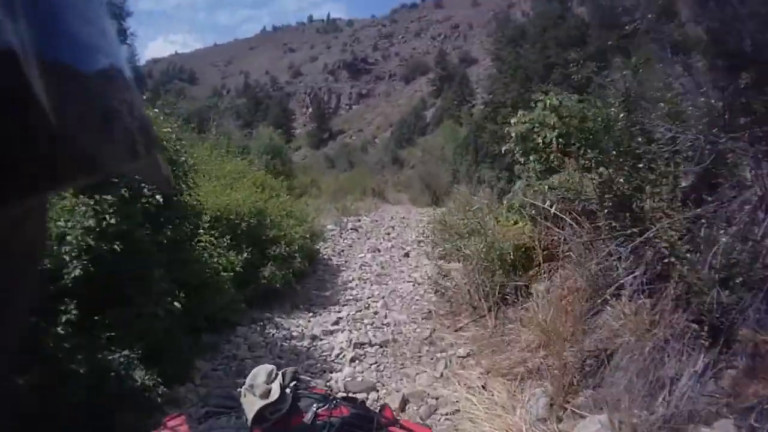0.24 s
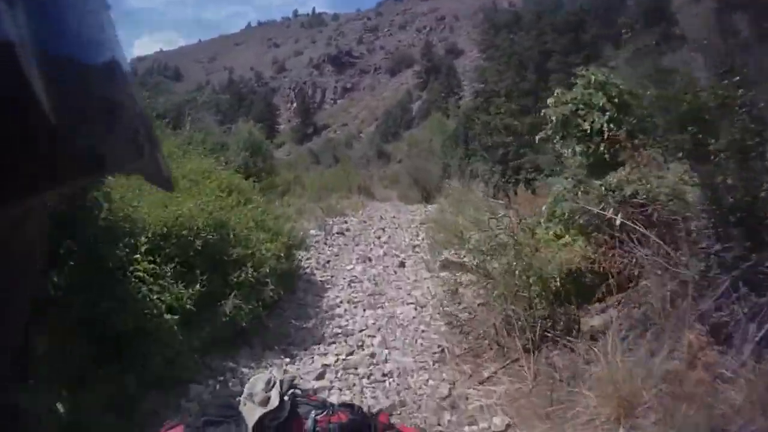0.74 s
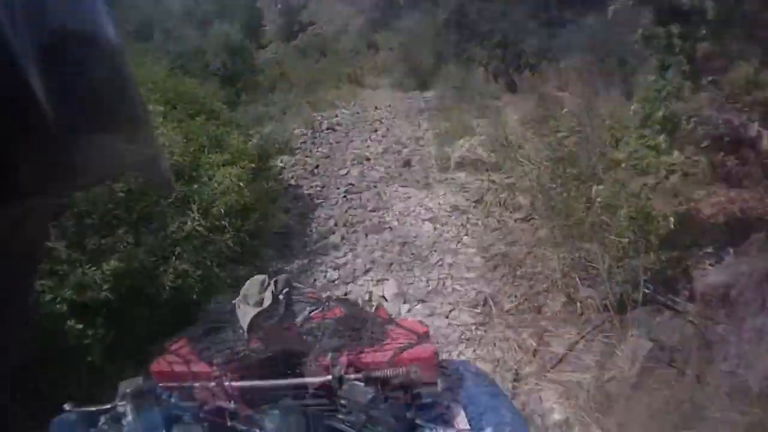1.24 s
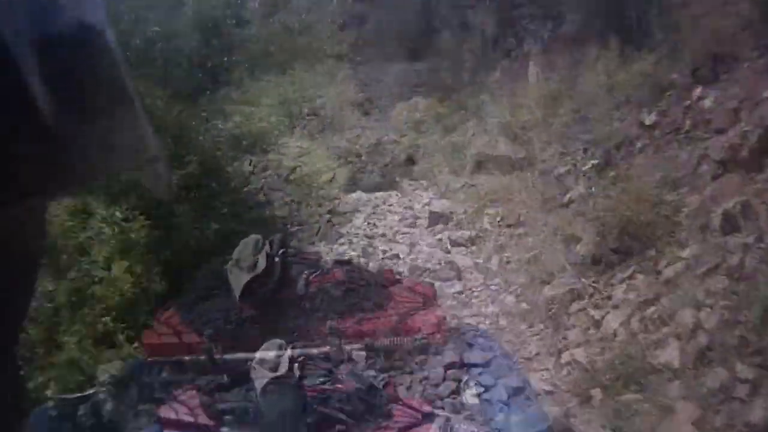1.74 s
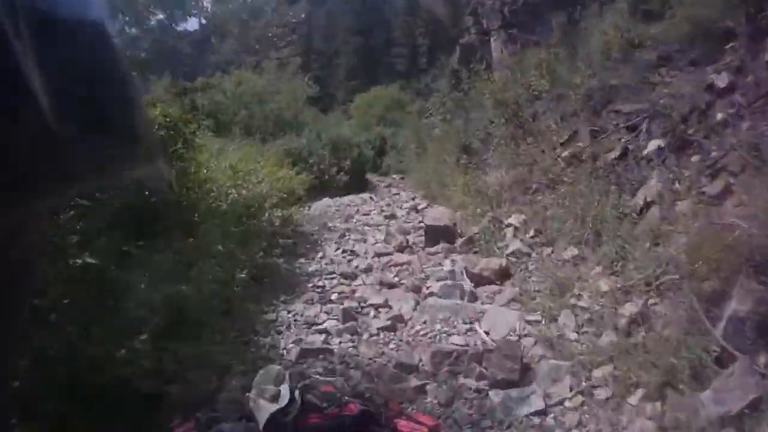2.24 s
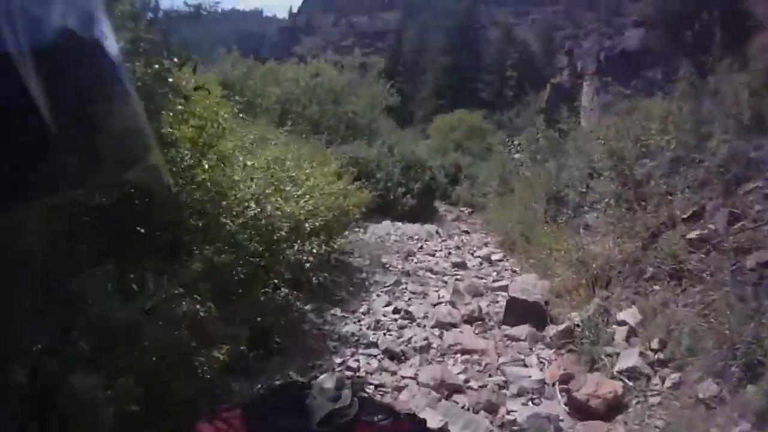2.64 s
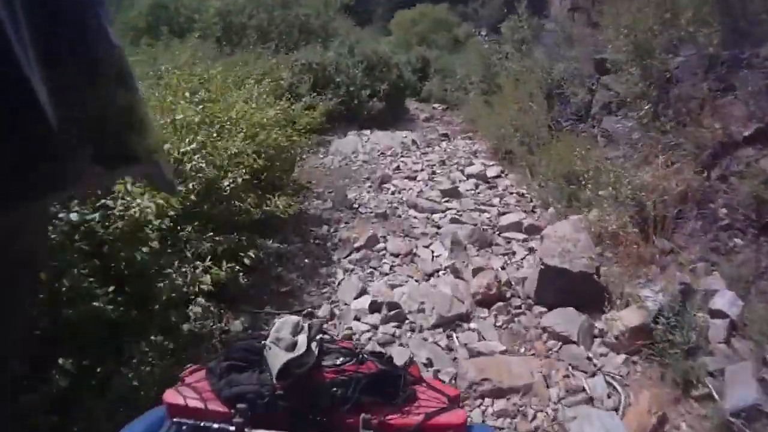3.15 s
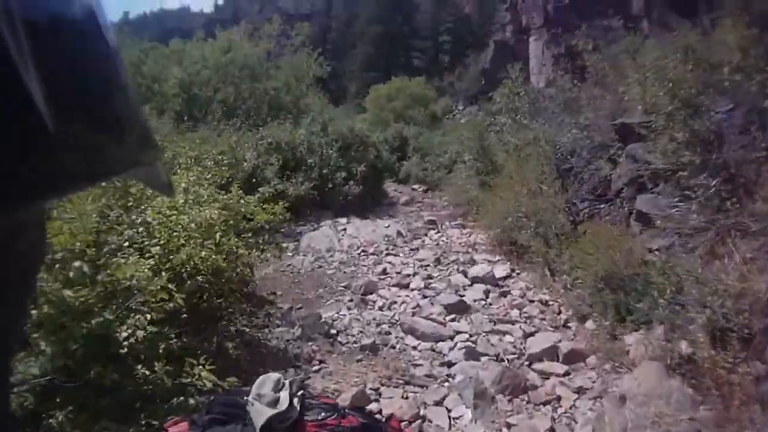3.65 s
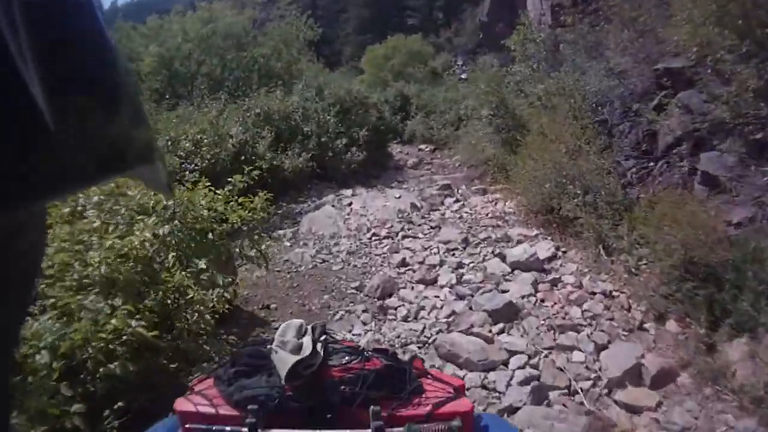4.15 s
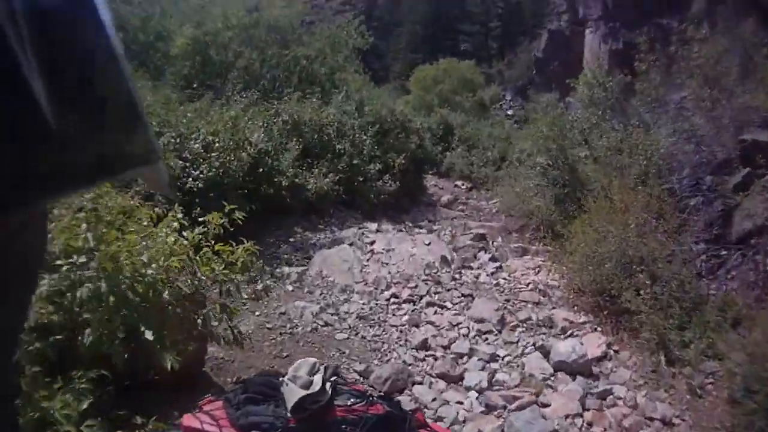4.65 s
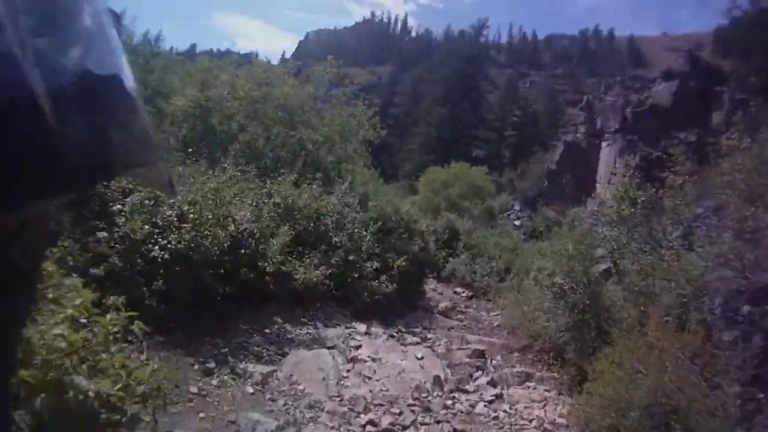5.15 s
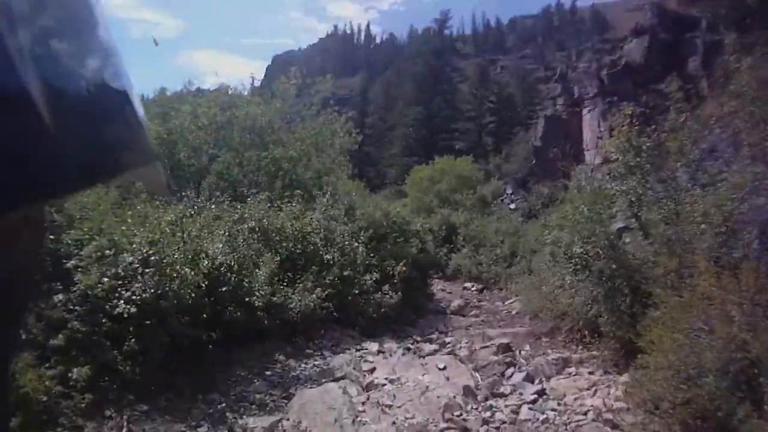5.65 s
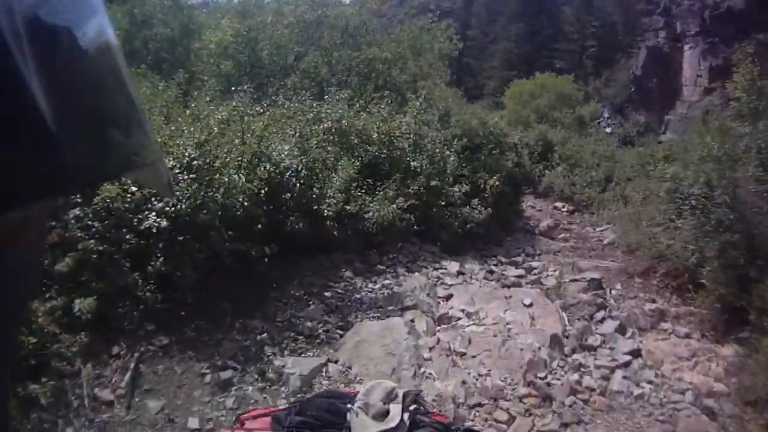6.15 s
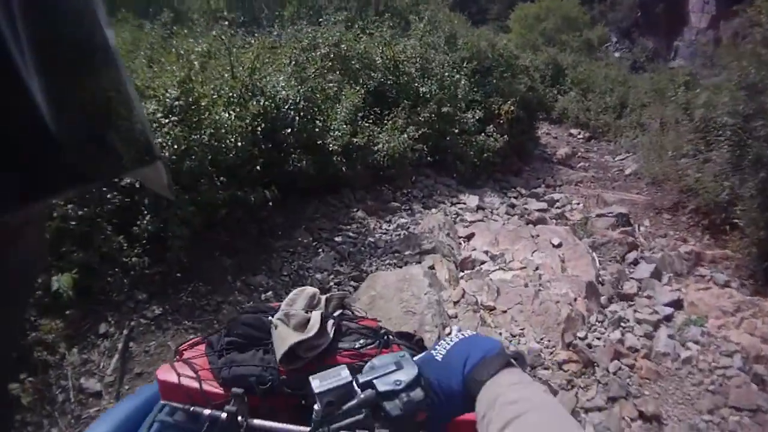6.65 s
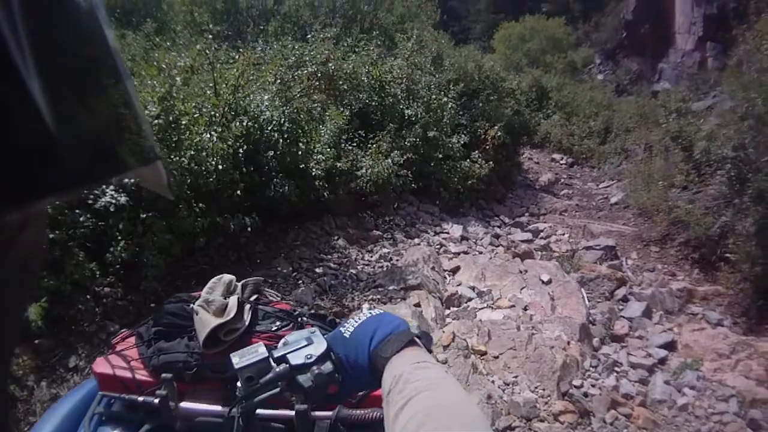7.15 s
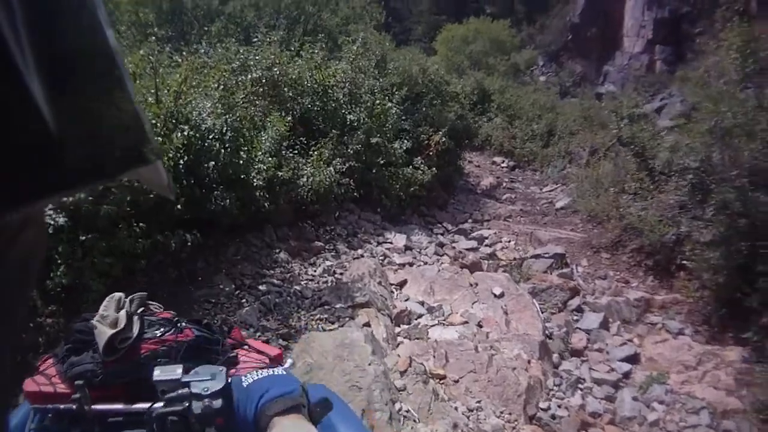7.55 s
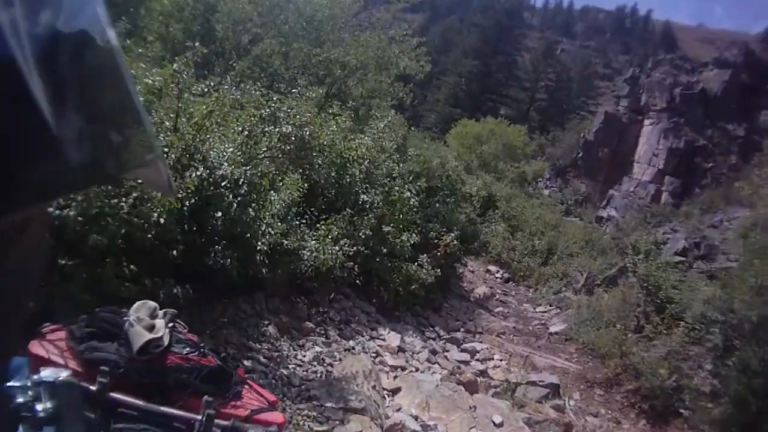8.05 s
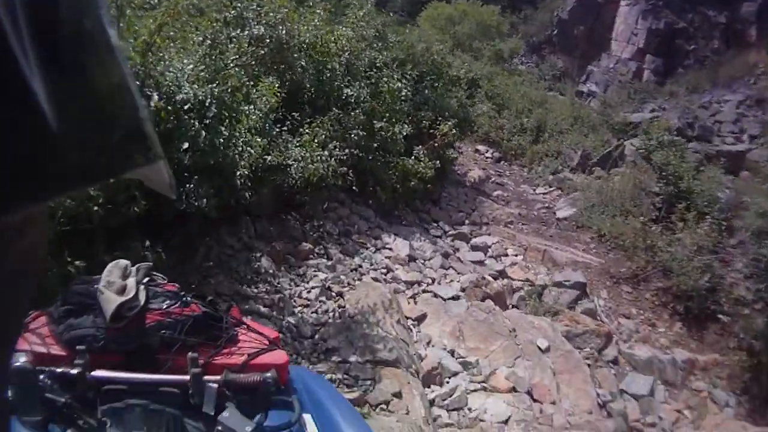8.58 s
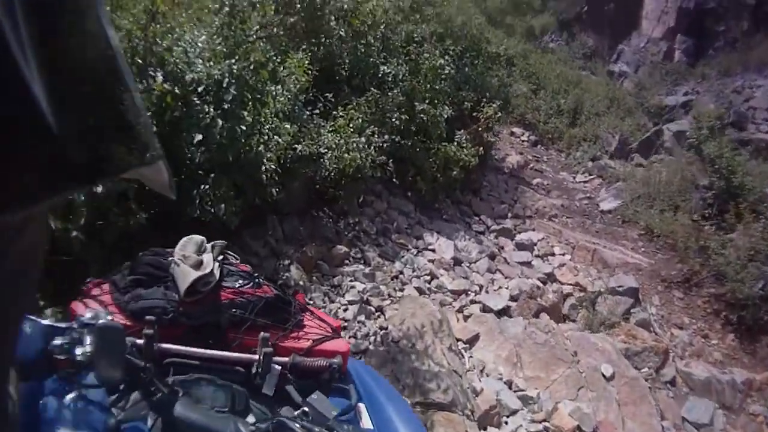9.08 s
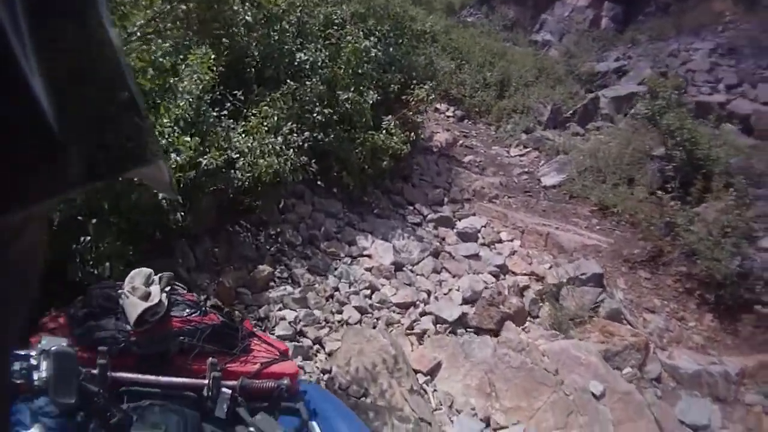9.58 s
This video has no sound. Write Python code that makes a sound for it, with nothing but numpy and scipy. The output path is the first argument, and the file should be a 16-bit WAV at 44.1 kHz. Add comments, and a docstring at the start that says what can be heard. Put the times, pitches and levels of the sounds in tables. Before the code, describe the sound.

A single-cylinder quad bike growls down a rocky trail, drops to a thudding idle and revs once, amid stone clacks, chassis thumps and plastic ticks.

```python
"""A single-cylinder quad bike engine pulls, sinks to a thudding idle and is revved once more, on a rocky trail.
Heard from the rider's seat, each firing excites the exhaust's damped resonances; knocks ring pipe and air box.
Frame rumble and mechanical whirr are coloured noise; the crankshaft adds a hum at multiples of its rate.
Stones clack, the chassis thumps and plastic ticks close by: short blows ring damped modes.
Gravel crunches as a dense train of random grains, over a faint steady hiss."""
import sys
import numpy as np
from scipy import signal
from scipy.fft import rfft, irfft
from scipy.io import wavfile

SR = 44100
rng = np.random.default_rng(int(sys.argv[2]) if len(sys.argv) > 2 else 0)


def wav_record(signal):
    """Record a signal, one row per channel, as 16-bit PCM in the file named by sys.argv[1]."""
    frames = np.transpose(np.atleast_2d(signal))
    bounded = np.clip(frames, -1, 1)
    # unit amplitude maps onto the largest positive 16-bit level
    quanta = np.round(bounded * 32767).astype(np.int16)
    wavfile.write(sys.argv[1], SR, quanta)


N = 433062
TIME = np.arange(N) / SR  # s

# faint background hiss: (frequency [Hz], relative density [dB per Hz])
HISS = [(100, -5.5), (4000, -16.0), (10000, -18.0), (16000, -18.5)]
# colour of the cracking grit: (frequency [Hz], relative density [dB per Hz])
GRIT_COLOUR = [(900, -13), (1900, 3), (2600, 3), (4200, -2.5), (5300, -11.5), (6800, -9.5), (10000, -23),
               (15000, -27)]
# tyres scrunching through loose gravel: (time [s], level [dB], half length [s])
SCRUNCHES = [(0.228, -50.5, 0.019), (0.822, -43.5, 0.04), (1.114, -52, 0.025), (1.479, -45, 0.022),
             (1.648, -48, 0.015), (2.39, -51.5, 0.042), (3.652, -52.5, 0.028), (4.51, -58, 0.0088),
             (6.253, -58.5, 0.057), (6.356, -54.5, 0.02), (6.594, -57.5, 0.072)]
# loudest stones under the tyres:
# (time [s], peak before a common lift [dB], pitch [Hz], relative dull part [dB], scrape decay [s])
STONES = [(0.715, -33.5, 2530, -21, 0.0045), (0.8123, -37, 2660, -24, 0.0064),
          (0.853, -37, 2980, -17, 0.0087), (1.0155, -34.5, 3100, -18, 0.0037),
          (1.295, -27.5, 2520, -12, 0.0026), (1.457, -38, 3100, -15, 0.0057),
          (2.39, -34.5, 2210, -7, 0.013), (2.855, -27.5, 2370, -11, 0.0037),
          (2.981, -41, 2600, -23, 0.0049), (3.218, -28.5, 2400, -12, 0.0027), (3.355, -41, 2730, -4, .008),
          (3.384, -50, 3600, -10, .004), (3.505, -35, 2450, -8, 0.0036), (3.567, -46, 2500, -16, .003),
          (3.632, -29.5, 2850, -14, 0.0026), (3.7436, -33, 3040, -20, .005),
          (3.857, -40.5, 2740, -18, .005), (3.922, -32.5, 2500, -7, 0.0039),
          (4.144, -43, 2430, -16, 0.0023), (4.7717, -43, 2540, -5, .004), (5.25, -45, 2300, 8, 0.0046),
          (5.355, -48, 3100, -20, .003), (5.390, -39, 3340, -8, 0.005), (5.53, -27, 2530, -7, 0.0035),
          (6.1883, -38.5, 2440, -7, 0.0037), (8.4056, -38.5, 3010, -16, 0.0022)]
# chassis thumps: (time [s], peak level [dB], pitch [Hz], ring as Q [-])
THUMPS = [(0.231, -29.5, 413, 3.5), (0.584, -33, 514, 3.5), (0.606, -21.5, 530, 4), (1.502, -21, 432, 2.7),
          (2.742, -45, 500, 4), (3.2495, -20, 395, 2.4), (3.356, -28, 690, 2.3), (3.631, -28.5, 810, 10),
          (3.646, -28, 604, 4), (4.356, -25, 470, 3.1), (4.774, -29.5, 540, 3.2), (5.415, -32.5, 610, 4),
          (5.507, -29.5, 480, 5.6), (5.9, -29.5, 340, 4.6), (5.903, -38, 720, 4), (5.912, -26, 458, 4.7),
          (5.921, -37, 680, 4), (6.566, -24, 464, 5.6), (7.021, -29, 464, 2.9), (7.316, -27.5, 567, 4),
          (8.37, -43, 700, 4), (8.612, -37, 404, 5.3), (9.718, -30, 393, 2.5)]
# plastic ticks, before a lift for each part: (time [s], bright snap [dB], lower body [dB])
TICKS = [(1.338, -39.5, -36), (2.2715, -22, -29.5), (2.8352, -31, -42), (3.198, -26, -31),
         (3.4761, -24.5, -30.5), (3.8895, -28, -32.5), (4.9447, -27.5, -25.5), (5.0849, -54, -46.5),
         (5.196, -56, -42), (5.201, -29, -35.5), (5.225, -48, -46), (5.229, -55, -50), (5.396, -54, -53),
         (5.4207, -39, -33), (6.4512, -20.5, -27), (8.4059, -45, -51)]
# modes of the plastic: (frequency [Hz], width [Hz], relative level [dB])
PLASTIC_MODES = [(1590, 69, -2.5), (2190, 360, -16), (3450, 560, 6.5), (4540, 230, -18), (6630, 370, 4.5),
                 (7670, 600, -2), (8390, 800, 0), (9800, 1000, -3), (13000, 2500, -21.5)]
# engine speed: (time [s], firing rate [per s])
FIRING_RATE = [(0.0, 23.6), (0.52, 23.75), (0.62, 29.2), (1.53, 28.5), (1.77, 26.5), (2.34, 22.5),
               (2.49, 21.1), (2.87, 20.28), (3.2, 17.08), (3.99, 15.65), (4.26, 14.32), (4.93, 14.12),
               (5.25, 13.18), (5.41, 13.89), (6.41, 13.01), (7.05, 20.59), (7.6, 21.11), (8.09, 17.7),
               (8.41, 13.15), (8.93, 13.73), (9.12, 13.12), (9.82, 13.59)]
# how the machine is ridden:
# (time [s], throttle [0-1], load on the exhaust [dB], shaking from the ground [dB])
RIDE = [(0, 0.94, -5, 2.1), (.56, 0.71, -5.5, 1.3), (.6, 1, -2.5, 5.5), (1.45, 0.77, -4, 5),
        (1.7, 0.67, -8, 6), (2.05, 0.31, 1.5, 5.5), (2.85, 0.33, -3, 4), (3.6, 0.12, -6.5, 3),
        (4.2, 0.5, -1, 1.5), (4.7, 0.04, -0.5, 2.5), (5.6, 0.16, -1, 0), (6.4, 0.35, 0, 1.34),
        (7.05, 0.84, 2, 0.5), (7.9, 0.68, -0.5, -0.5), (8.35, 0.05, -1, -2), (8.85, 0.42, -0.5, -1.5),
        (9.82, 0, -0.5, -0.5)]
# rumble of frame and panels: (frequency [Hz], relative density [dB per Hz])
RUMBLE_COLOUR = [(20, -37), (50, -13.5), (100, -5.5), (150, -15.5), (220, -3.5), (310, -4), (440, 1.5),
                 (600, -5), (750, -15.5), (900, -24), (1200, -77)]
# whirr of valve gear and drive train: (frequency [Hz], relative density [dB per Hz])
WHIRR_COLOUR = [(600, 12), (950, -0.5), (1250, 3.5), (1650, -1), (1950, 3), (2600, 5), (3050, -5.5),
                (4100, -3), (5200, -19), (6600, -9.5), (10000, -23.5), (15000, -20)]
# rush of gas after each firing: (frequency [Hz], relative density [dB per Hz])
RUSH_COLOUR = [(25, -25), (55, -17), (90, -35), (150, -15), (230, 2), (320, -1), (450, 3), (600, -0.5),
               (760, -11), (900, -21), (1200, -74)]
# machinery knocks: (share of the cycle [-], relative level at idle [dB], growth [dB per octave of speed])
KNOCKS = [(.06, 1.5, 0), (.23, 0, 4), (0.331, -4.5, -1), (.43, -19.5, 18.5), (0.578, -15, 5),
          (.8, -7.5, 7.5)]
# air box and pipe resonances: (frequency [Hz], width [Hz], relative level [dB])
PIPE_RESONANCES = [(406, 101, -2), (464, 81, 1), (555, 30, -13.5), (620, 70, -10), (810, 31, -19)]
# silencer resonances before gas heat and fullness: (frequency [Hz], width [Hz], relative level [dB])
SILENCER_RESONANCES = [(187, 21, -31), (217.9, 83, 8), (252, 160, -4.5)]
# boom of the largest silencer chamber: (time [s], frequency [Hz], relative level [dB])
BOOM = [(0, 112, 7), (.7, 116, -4.5), (1.6, 108, 3), (2.0, 98, 2), (3.05, 97, 4), (3.6, 78, 0),
        (4.0, 99, -1), (6.4, 98, -1), (7.3, 113, 1), (8.2, 101, 1), (9.82, 95, -5)]

# voice laws: (level at idle on smooth ground [dB], growth [dB per octave], growth [dB per dB of shaking])
BARK_LAW = (-51, 6.1, 0.29)
RUSH_LAW = (-51.5, 1.7, 0.6)
RUMBLE_LAW = (-48.5, 3.84, 2.1)
WHIRR_LAW = (-57, 4.96, 1)

# engine cycle: firing rate at idle, starting share of a cycle
IDLE_PER_S, FIRST_PHASE = 13.5, .413
THUD_DB, THUD_DB_PER_OCTAVE = -41.7, 7.6
# an open throttle heats the exhaust gas: factor on its speed of sound, rising further with engine speed
GAS_SPEED_SHUT, GAS_SPEED_PER_THROTTLE, GAS_SPEED_PER_OCTAVE = 0.95, 0.12, 0.19
FULLNESS_POWER = 0.56  # octaves of ring length per octave of speed at full throttle
BOOM_WIDTH_HZ = 50.3  # before fullness
# deep push of gas that rounds each thud and fades with speed
PUSH_HZ, PUSH_WIDTH_HZ, PUSH_DB, PUSH_LOSS_DB_PER_OCTAVE = 62, 37, -4, 17
# tailpipe echo: delay before gas heat, strength at idle, loss per octave of speed
ECHO_S, ECHO_DB, ECHO_LOSS_DB = 0.01037, -7, 7
# the throttle snaps shut after the rev and two firings come out weak
FALTER_S, FALTER_HALF_S, FALTER_LOSS_DB = 8.272, .068, 7
# crankshaft hum: multiples of its turning rate, relative levels, whole level at idle and its growth
CRANK_MULTIPLES = (4, 5, 7, 8, 10)
CRANK_LEVELS_DB = (-4.5, -2.5, -4, -4.5, -6)
CRANK_DB, CRANK_DB_PER_OCTAVE = -70.5, 29
COVER_DB, COVER_HZ = -13.5, 1433.5  # level beside the whirr

# pebbles: time span, count, least level on smooth ground, size range, pitch range
ROLLING_S, PEBBLE_COUNT = 6.7, 260
PEBBLE_DB, PEBBLE_SPREAD_DB, PEBBLE_LOW_HZ, PEBBLE_HIGH_HZ = -60, 5, 1790, 3200
PEBBLE_SHAKING_SHARE = 2.3  # dB per dB of shaking
# thumps: scrape decay by 60 dB, scrape strength, low-pass cutoff over pitch
THUMP_T60_S, THUMP_GRIT, THUMP_TOP_RATIO = 0.08, 0.03, 1.4
# a tick springs back: delay, least and greatest share of the first blow
CATCH_S, CATCH_SHARE = .00099, (.3, .55)
# grit: grain rate, size scale, crunch level over the whirr law, its extra growth per dB of shaking
GRIT_PER_S, GRIT_SPREAD_DB, CRUNCH_DB, CRUNCH_SHARE = 2500, 2.5, -11.5, 0.4
CUTOFF_HZ = 15500


def from_db(db):
    """Amplitude ratio from the logarithmic decibel scale."""
    return 10 ** (np.asarray(db) / 20)


def rms_one(x):
    """Normalization to unit mean power."""
    return x / np.sqrt(np.mean(x ** 2) + 1e-20)


def in_time(rows):
    """Linear interpolation of each column of a curve at every sample."""
    s, *columns = np.transpose(rows)
    return [np.interp(TIME, s, column) for column in columns]


def coloured(x, spectrum):
    """Spectral shaping: a frequency-dependent gain, then unit power."""
    hz, db = np.transpose(spectrum)
    bins = np.maximum(np.arange(N // 2 + 1) * SR / N, 1)
    gain = from_db(np.interp(np.log(bins), np.log(hz), db, right=-90))
    return rms_one(irfft(rfft(x) * gain, N))


def noise(spectrum):
    """Gaussian random noise with a shaped spectrum and unit power."""
    return coloured(rng.standard_normal(N), spectrum)


def drift(per_s):
    """Random modulation: straight lines between Gaussian knots of unit spread."""
    knots = rng.standard_normal(N // 50)
    return np.interp(TIME * per_s, np.arange(len(knots)), knots)


def resonate(x, hz, width_hz):
    """Damped resonance: a pole pair with about unit gain at its peak."""
    r = np.exp(-np.pi * width_hz / SR)
    zeros = np.array([1, 0, -1]) * (1 - r * r) / 2
    poles = [1, -2 * r * np.cos(2 * np.pi * hz / SR), r * r]
    return signal.lfilter(zeros, poles, x + 1e-18)


def lowpass(x, hz, order=2):
    """Butterworth low-pass: maximally flat below the cutoff."""
    return signal.sosfilt(signal.butter(order, min(hz, SR / 2 - 1), fs=SR, output="sos"), x)


def add(out, s, sound, db):
    """Linear superposition of a sound at time s, scaled to the given peak level."""
    at = max(round(s * SR), 0)
    out[at:at + len(sound)] += (from_db(db) * sound / np.abs(sound).max())[:N - at]


def contact(length_s, grit):
    """Impulsive contact: a unit blow followed by exponentially decaying friction noise."""
    t = TIME[:SR // 6]
    scrape = grit * rng.standard_normal(len(t)) * np.exp(-t / length_s)
    return (t == 0) + scrape


def engine_state():
    """Logarithmic speed scale: firing rate, octaves over idle, and the ride's controls."""
    per_s, = in_time(FIRING_RATE)
    return per_s, np.log2(per_s / IDLE_PER_S), *in_time(RIDE)


def level_db(law, octaves, shaking_db):
    """Power-law excitation: level rises linearly with octaves of speed and decibels of shaking."""
    idle_db, db_per_octave, share = law
    return idle_db + db_per_octave * octaves + share * shaking_db


def background_hiss():
    """Stationary random noise at a faint, even level."""
    return from_db(-70.5) * noise(HISS)


def gravel():
    """Shot noise: random grit grains form a running crunch and short stronger spurts."""
    _, octaves, _, _, shaking_db = engine_state()
    spurts = sum(from_db(db) * np.exp(-((TIME - s) / half_s) ** 2) for s, db, half_s in SCRUNCHES)
    crunch_db = level_db(WHIRR_LAW, octaves, shaking_db) + CRUNCH_DB + CRUNCH_SHARE * shaking_db
    crunch = from_db(crunch_db + 1.6 * drift(45))
    sizes = from_db(GRIT_SPREAD_DB * np.minimum(rng.exponential(1, N), 4)) * rng.choice([-1, 1], N)
    grains = sizes * (rng.random(N) < GRIT_PER_S / SR)
    # the two envelopes add in power
    return np.hypot(spurts, crunch) * coloured(grains, GRIT_COLOUR)


def clack(hz, dull_db, scrape_s):
    """Modal impact: a grating stone rings close, heavily damped modes over a duller knock."""
    blow = contact(length_s=scrape_s, grit=.11)
    modes = resonate(blow, hz, 350) - 0.099 * resonate(blow, 1.23 * hz, 290)
    ring = resonate(modes, hz, 1100)
    knock = 0.9 * resonate(blow, 1940, 220) - resonate(blow, 1364, 180) + 0.84 * resonate(blow, 840, 170)
    return lowpass(ring + from_db(dull_db + 2.5) * knock, 1.27 * hz, order=4)


def stones():
    """Random impacts: loud clacks at set times and small pebbles at chance times while the wheels roll."""
    out = np.zeros(N)
    for s, db, hz, dull_db, scrape_s in STONES:
        add(out, s, clack(hz, dull_db, scrape_s), db + 2)
    *_, shaking_db = engine_state()
    for when, size, pitch in rng.random(size=(PEBBLE_COUNT, 3)):
        s = when * ROLLING_S
        hz = PEBBLE_LOW_HZ + (PEBBLE_HIGH_HZ - PEBBLE_LOW_HZ) * pitch
        db = PEBBLE_DB + PEBBLE_SHAKING_SHARE * shaking_db[int(s * SR)] + PEBBLE_SPREAD_DB * size ** 2
        add(out, s, clack(hz, dull_db=-17.0, scrape_s=0.004), db)
    return out


def chassis():
    """Structural impulse response: a rock jolts frame and load, ringing two close modes in a dry knock."""
    out = np.zeros(N)
    for s, db, hz, q in THUMPS:
        blow = contact(length_s=THUMP_T60_S / np.log(1000), grit=THUMP_GRIT)
        knock = resonate(blow, hz, hz / q) - from_db(-1.0) * resonate(blow, 0.866 * hz, hz / q)
        add(out, s, lowpass(resonate(knock, hz, 480), THUMP_TOP_RATIO * hz, order=4), db)
    return out


def plastic_ticks():
    """Slip and elastic rebound: opposite blows a millisecond apart ring the modes of hard plastic."""
    out = np.zeros(N)
    is_body = np.array(PLASTIC_MODES)[:, 0] < 5500
    for s, snap_db, body_db in TICKS:
        slip = contact(length_s=.002, grit=.03)
        slip[round(CATCH_S * SR)] -= rng.uniform(*CATCH_SHARE)
        modes = np.array([from_db(db + rng.normal(0, 1)) * resonate(slip, hz, width_hz)
                          for hz, width_hz, db in PLASTIC_MODES])
        body = modes[is_body].sum(axis=0)
        snap = modes[~is_body].sum(axis=0)
        # subtracting the low-passed part thins out the bass
        add(out, s, body - lowpass(body, 700, order=1), body_db + 6.0)
        add(out, s + .0001, snap, snap_db + 9.5)
    return out


def firings(cycles, per_s, uneven_db, jitter_s):
    """Quasi-periodic pulse train: one uneven click per cycle, scaled for even mean power at any rate."""
    at = np.flatnonzero(np.diff(np.floor(cycles)) > 0)
    chance = rng.standard_normal((len(at), 2))
    moved = np.clip(at + (chance[:, 1] * jitter_s * SR).astype(int), 0, N - 1)
    clicks = np.zeros(N)
    clicks[moved] = from_db(uneven_db * chance[:, 0]) / np.sqrt(per_s[at])
    return clicks


def surge(since_s, delay_s, length_s, steady):
    """Periodic amplitude modulation: a swell after each firing over a steady part, at unit power."""
    return rms_one(steady + np.exp(-((since_s - delay_s) / length_s) ** 2))


def crank(cycles, octaves):
    """Harmonic forced vibration: the crankshaft, turning twice per firing, hums louder with speed."""
    hum = 0
    for multiple, db in zip(CRANK_MULTIPLES, CRANK_LEVELS_DB):
        tone = np.sin(2 * np.pi * (multiple * 2 * cycles + rng.random()))
        hum = hum + from_db(db + 2 * drift(5)) * tone
    return from_db(CRANK_DB + CRANK_DB_PER_OCTAVE * octaves) * rms_one(hum)


def whirr(since_s, octaves, shaking_db):
    """Modulated broadband noise: valve gear and drive train swell per firing, with a narrow cover ring."""
    cover = rms_one(resonate(rng.standard_normal(N), COVER_HZ, 40)) * from_db(1.9 * drift(10))
    swell = surge(since_s, delay_s=0.019, length_s=0.016, steady=2.4)
    gain = from_db(level_db(WHIRR_LAW, octaves, shaking_db) + 2.43 * drift(90))
    return gain * (noise(WHIRR_COLOUR) + from_db(COVER_DB) * cover) * swell


def gas_rush(since_s, octaves, shaking_db):
    """Turbulent flow noise: a rush of gas swells after each firing."""
    swell = surge(since_s, delay_s=0.022, length_s=0.014, steady=0.28)
    return from_db(level_db(RUSH_LAW, octaves, shaking_db) + 2.8 * drift(13)) * noise(RUSH_COLOUR) * swell


def bark(cycles, per_s, octaves):
    """Resonant response: machinery knocks within each cycle ring the pipe and air box."""
    blows = 0
    for phase, db, db_per_octave in KNOCKS:
        knocks = firings(cycles - phase, per_s, uneven_db=1.8, jitter_s=.0001)
        blows = blows + from_db(db + db_per_octave * octaves) * knocks
    # neighbouring resonances swing in alternate directions
    rings = sum((-1) ** k * from_db(db) * resonate(blows, hz, width_hz)
                for k, (hz, width_hz, db) in enumerate(PIPE_RESONANCES))
    return rms_one(lowpass(resonate(rings, 368, 600), 950, order=4))


def puff(t, hz, width_hz, db):
    """Cascaded damping: one resonance swells as time squared, then dies exponentially."""
    age = np.pi * width_hz * t
    return from_db(db) * width_hz * age ** 2 * np.exp(-age) * np.sin(2 * np.pi * hz * t)


def exhaust(clicks, throttle, octaves):
    """Cascaded resonance and reflection: puffs pass three chambers in a row and echo once in the tailpipe."""
    t = TIME[:SR // 7]
    out = np.zeros(N + len(t))
    boom_hz, boom_db = in_time(BOOM)
    for at in np.flatnonzero(clicks):
        # hotter gas lifts the silencer resonances; fuller puffs ring longer
        heat = GAS_SPEED_SHUT + throttle[at] * (GAS_SPEED_PER_THROTTLE + GAS_SPEED_PER_OCTAVE * octaves[at])
        fullness = 2 ** (FULLNESS_POWER * throttle[at] * octaves[at])
        thud = sum((-1) ** k * puff(t, hz * heat, width_hz / fullness, db)
                   for k, (hz, width_hz, db) in enumerate(SILENCER_RESONANCES))
        thud = thud - puff(t, boom_hz[at], BOOM_WIDTH_HZ / fullness, boom_db[at])
        thud = thud + puff(t, PUSH_HZ, PUSH_WIDTH_HZ, PUSH_DB - PUSH_LOSS_DB_PER_OCTAVE * octaves[at])
        echo_gain = from_db(ECHO_DB - ECHO_LOSS_DB * octaves[at])
        echo = echo_gain * np.interp(t - ECHO_S / heat, t, thud)
        out[at:at + len(t)] += clicks[at] * rms_one(thud + echo)
    return rms_one(out[:N])


def falter():
    """Amplitude modulation: a brief smooth dip in the gain of thud, bark and rush."""
    return from_db(-FALTER_LOSS_DB * np.exp(-((TIME - FALTER_S) / FALTER_HALF_S) ** 4))


def engine():
    """Source-filter principle: the firing cycle drives thud, bark, rush, hum and whirr, over frame rumble."""
    per_s, octaves, throttle, load_db, shaking_db = engine_state()
    cycles = FIRST_PHASE + np.cumsum(per_s) / SR
    since_s = cycles % 1 / per_s
    puffs = firings(cycles, per_s, uneven_db=.6, jitter_s=.00003)
    thud_gain = from_db(THUD_DB + THUD_DB_PER_OCTAVE * octaves + load_db)
    thud = thud_gain * exhaust(puffs, throttle, octaves)
    pipe = from_db(level_db(BARK_LAW, octaves, shaking_db)) * bark(cycles, per_s, octaves)
    rush = gas_rush(since_s, octaves, shaking_db)
    rumble = from_db(level_db(RUMBLE_LAW, octaves, shaking_db)) * noise(RUMBLE_COLOUR)
    machinery = crank(cycles, octaves) + rumble + whirr(since_s, octaves, shaking_db)
    return falter() * (thud + pipe + rush) + machinery


def scene():
    """Linear superposition of hiss, ground, plastic and engine in one channel."""
    ground = gravel() + stones() + chassis()
    return (background_hiss() + ground + plastic_ticks() + engine())[None]


def record(dry):
    """Elliptic low-pass: a steep cut of the top of the spectrum."""
    return signal.sosfilt(signal.ellip(10, .2, 80, CUTOFF_HZ, fs=SR, output="sos"), dry)


dry = scene()
out = record(dry)
wav_record(out)
```